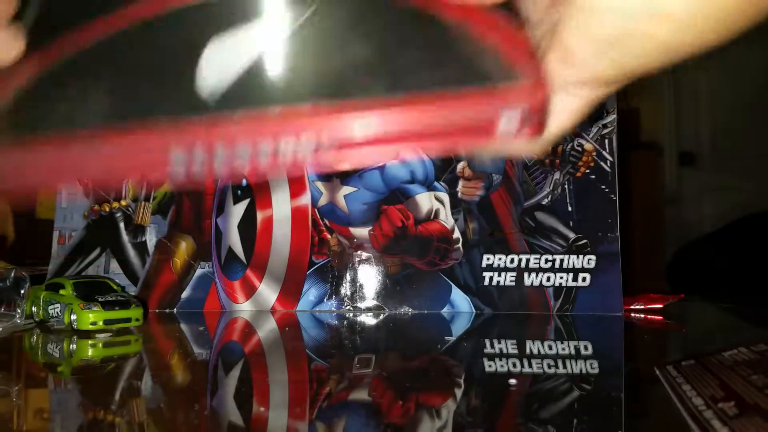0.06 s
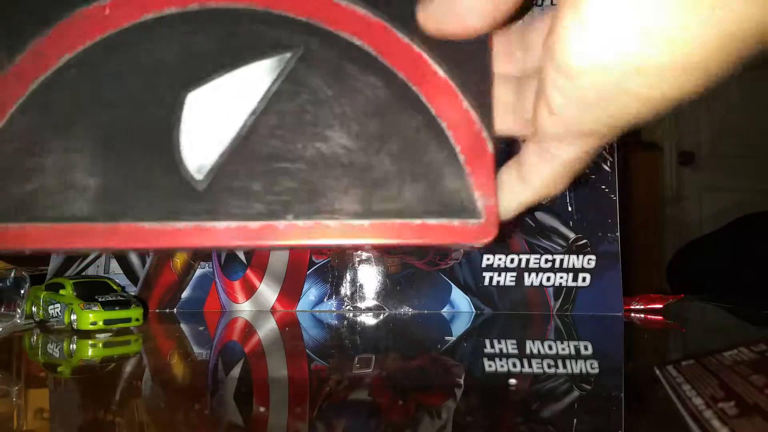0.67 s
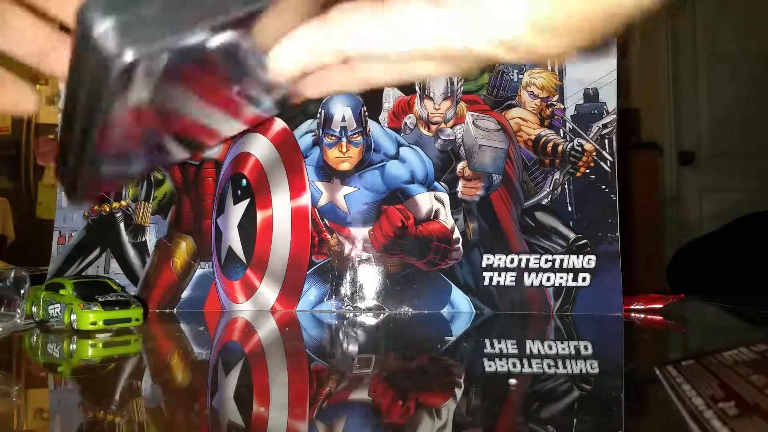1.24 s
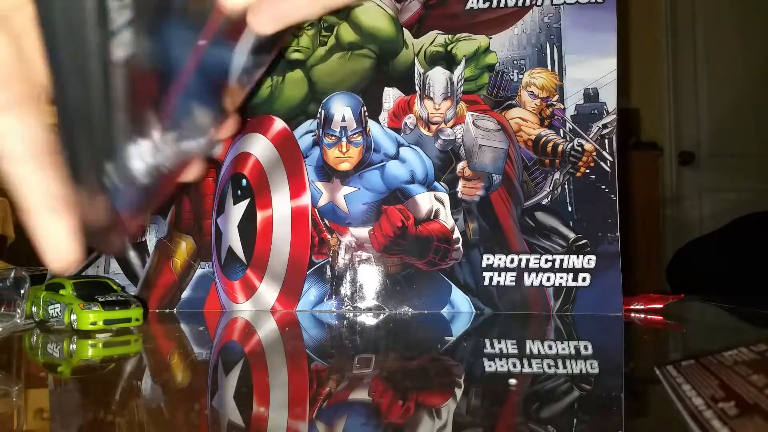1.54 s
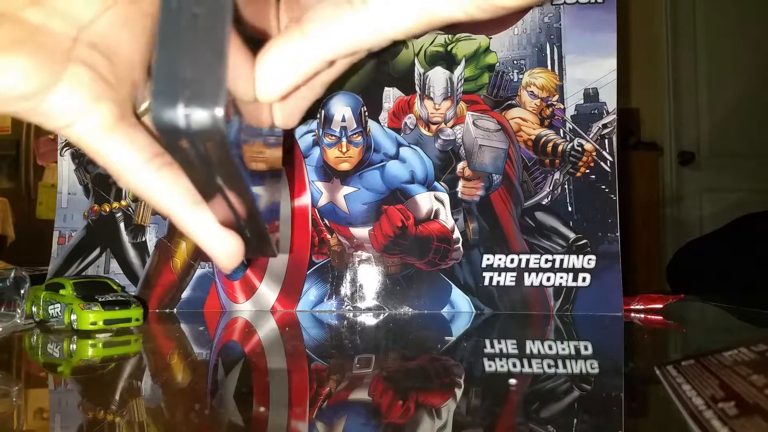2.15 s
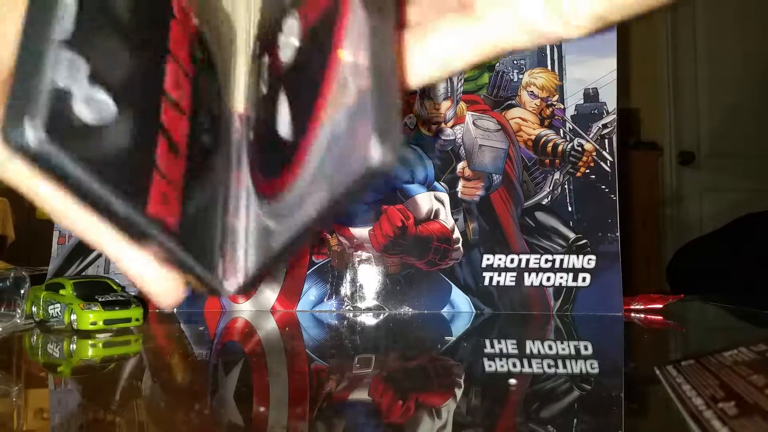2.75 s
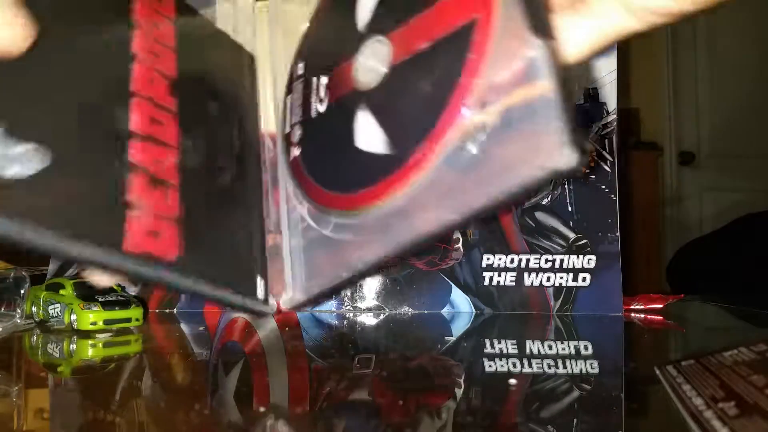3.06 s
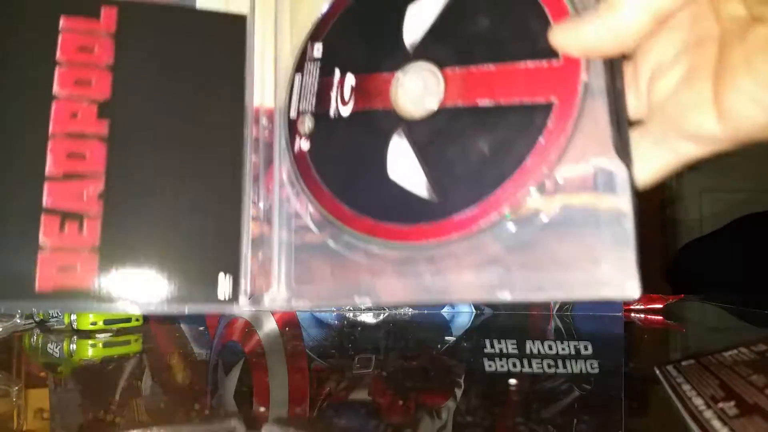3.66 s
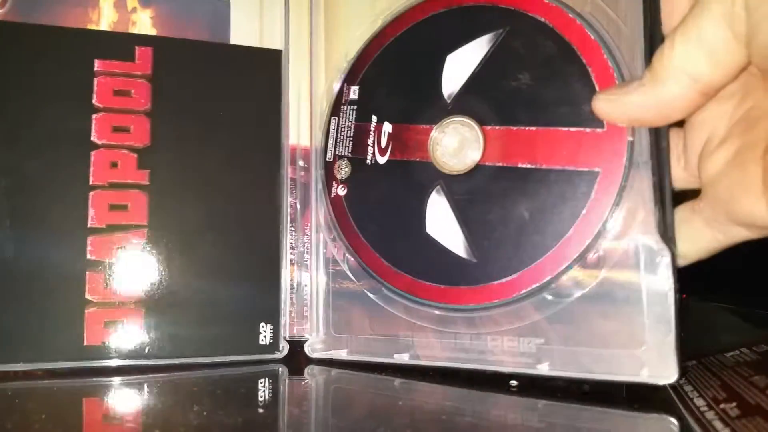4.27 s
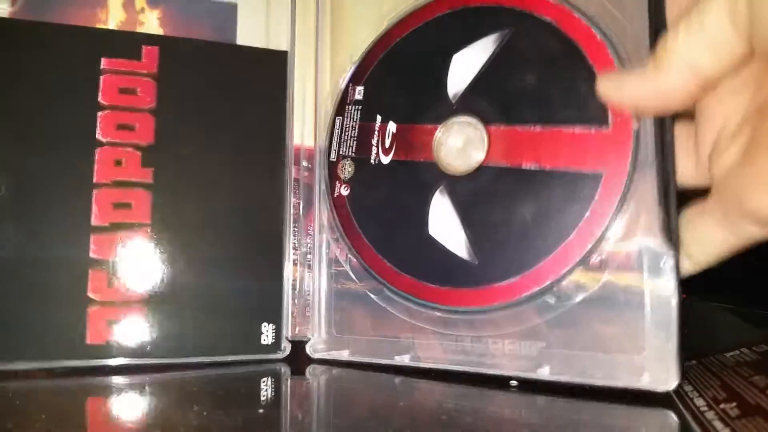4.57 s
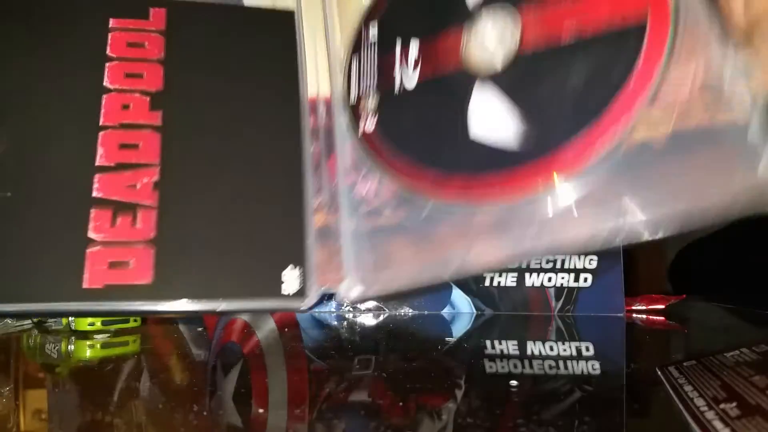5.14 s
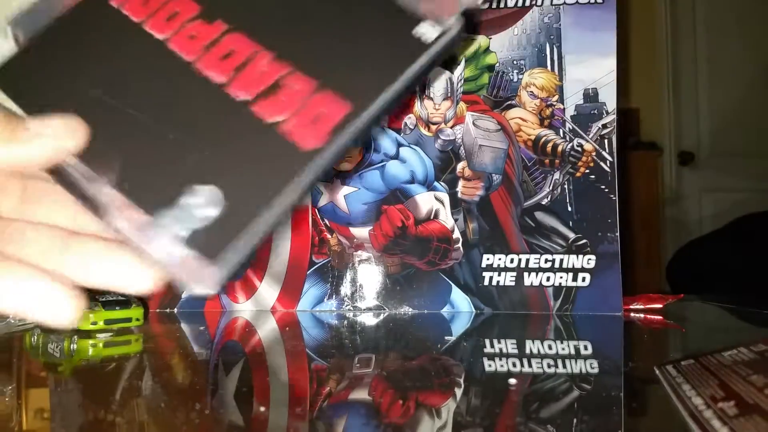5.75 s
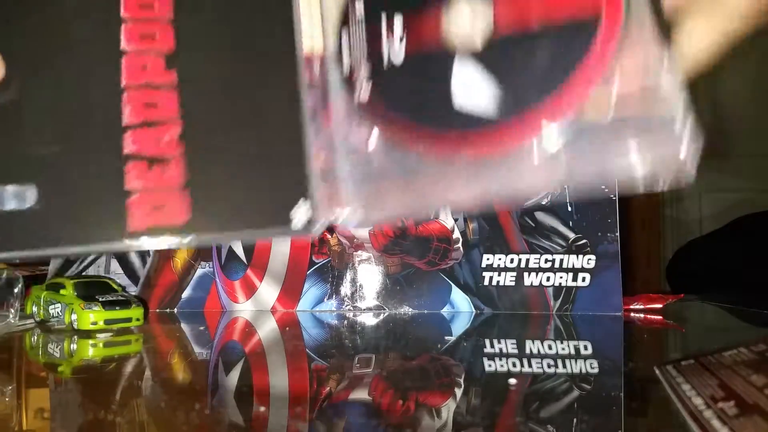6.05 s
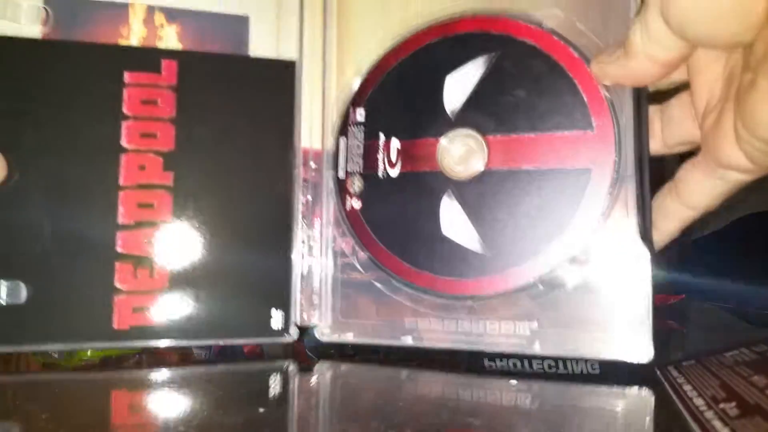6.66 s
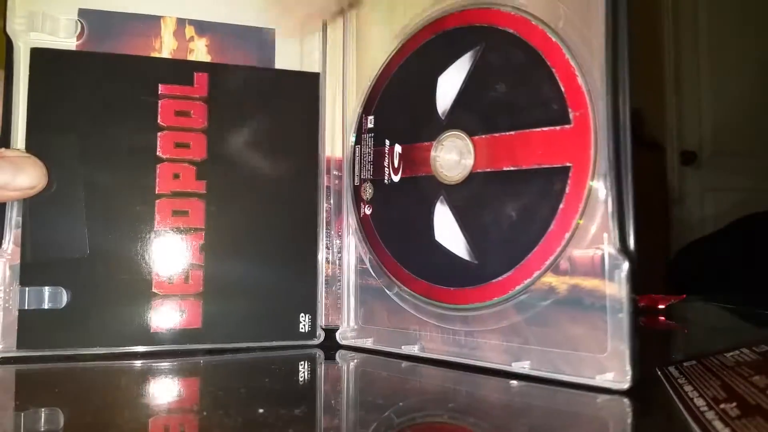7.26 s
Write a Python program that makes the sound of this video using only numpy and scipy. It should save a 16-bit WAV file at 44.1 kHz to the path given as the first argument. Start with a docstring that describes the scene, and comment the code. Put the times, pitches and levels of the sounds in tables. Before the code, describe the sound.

For the first two seconds, fingertips tap and slide on a closed metal disc case, making soft hollow clacks that cluster around one second. A faint skin squeak follows. At about 2.7 seconds the catch lets go with a loud, quick crack and a short tinny ring, trailed by light plastic ticks and rubbing. At 4 seconds the case lands on a glass-topped table with a loud, solid knock, then bumps softly several times around 4.5 seconds. A faint slide and squeak come near 5.5 seconds. From 6.4 seconds the plastic tray gives tiny dry ticks under quiet rubbing, with a moderate double knock at 6.8 seconds and lighter knocks at 7.3 and 7.4. Everything sounds close, in a small quiet room, over a faint appliance hum, microphone hiss and a very faint high pulsing note.

```python
"""Opening a metal disc case

In a small quiet room, fingers tap, slide and squeak on the case's tin shell. The catch lets go in a
quick run of cracks, the plastic tray ticks, and the open case knocks several times on a glass-topped
table. Each contact is a noise crack plus the ringing modes of the shell or table; each slide is grainy
stick-slip noise. Behind it all are a faint appliance hum, microphone hiss and a high, pulsing note."""
import sys
import numpy as np
from scipy import signal
from scipy.fft import rfft, irfft
from scipy.io import wavfile
from scipy.ndimage import uniform_filter1d

SR = 44100
rng = np.random.default_rng(int(sys.argv[2]) if len(sys.argv) > 2 else 0)


def wav_record(signal):
    """Record a signal, one row per channel, as 16-bit PCM in the file named by sys.argv[1]."""
    frames = np.transpose(np.atleast_2d(signal))
    bounded = np.clip(frames, -1, 1)
    # unit amplitude maps onto the largest positive 16-bit level
    quanta = np.round(bounded * 32767).astype(np.int16)
    wavfile.write(sys.argv[1], SR, quanta)


N = 331323

# edges of a contact's six bands, thump, body, panel, clack, click and fizz: (frequency [Hz])
BAND_EDGES = [45, 145, 450, 1400, 3500, 7500, 16000]
# modes of the tin shell before the hands damp it: (frequency [Hz], level [dB], t60 [s])
SHELL_MODES = [(72, -8, 0.011), (114, -7, 0.055), (173, -2, .05), (255, -1, .04), (360, -11.5, .05),
               (458, 1.5, 0.022), (631, 11, 0.054), (703, 5.5, 0.053), (825, 0, 0.082), (969, -14, 0.035),
               (1134, -8, 0.062), (1425, -11, 0.1), (1864, -2, 0.038), (2094, -7.5, 0.049),
               (2240, -4.5, 0.033), (3050, -13.5, 0.04), (3130, -13.5, 0.06), (4240, -10.5, 0.036),
               (5266, -4.5, .04), (6965, -16.5, .04)]
# strokes of a hand over the case: (start [s], end [s], murmur level [dB], hiss over murmur [dB])
HAND_STROKES = [(0.168, 0.369, -67, -1), (0.651, 1.359, -65, -8), (0.931, 1.073, -60, -28),
                (1.039, 1.186, -51, -12), (1.379, 2.25, -68.5, -5.5), (2.819, 3.074, -72, 5),
                (3.055, 3.176, -61, 3), (4.455, 4.634, -63, -1.5), (4.6, 5.118, -69, -2),
                (5.43, 5.565, -66.5, 10), (5.899, 6.351, -80.5, 12), (6.419, 7.098, -67.5, -1.5)]


def amp(db):
    """Decibels to gain."""
    return 10 ** (np.asarray(db) / 20)


def unit(x):
    """Scales to rms 1."""
    return x / np.sqrt(np.mean(x ** 2) + 1e-20)


def curve_at(points, hz):
    """Joins (frequency [Hz], value) points by straight lines on a log frequency axis."""
    point_hz, value = np.transpose(points)
    return np.interp(np.log(hz + 1), np.log(point_hz + 1), value)


def colour(x, spectrum):
    """Equalises a sound with a (frequency [Hz], gain [dB]) curve."""
    size = x.shape[-1]
    return irfft(rfft(x) * amp(curve_at(spectrum, np.fft.rfftfreq(size, 1 / SR))), size)


def add(mix, start_s, sound):
    """Mixes a stereo sound in at its start time."""
    part = mix[:, max(round(start_s * SR), 0):][:, :sound.shape[1]]
    part += sound[:, :part.shape[1]]


def noise_pair(size, shared):
    """White noise at two microphones that have a share of its power in common."""
    common, *own = rng.standard_normal((3, size))
    return np.sqrt(shared) * common + np.sqrt(1 - shared) * np.array(own)


def panned(x, left_db):
    """Leans a stereo sound to the left."""
    return x * amp([[left_db / 2], [-left_db / 2]])


def voicing(tone, strength_db, hardness, thud_db=0, thud_hz=150, left_db=0):
    """A contact's band levels and pan: a hard edge or nail tilts the treble up, weight adds a thud."""
    centres = np.sqrt(np.multiply(BAND_EDGES[:-1], BAND_EDGES[1:]))
    octaves = np.log2(centres / centres[2])  # above the panel band
    tilt = hardness * np.maximum(octaves, 0)
    thud = thud_db - 3 * np.log2(centres / thud_hz) ** 2  # 3 dB weaker one octave off its pitch
    return strength_db + np.array(tone) + tilt + thud * (octaves < 0), left_db


def strike(levels_db, modes, attack_s, ring_db, crack_t60, rattle_db, rattle_t60, shared, phase_spread):
    """One contact: a crack, a rattle of dense plate modes and the object's ring, balanced by band."""
    t = np.arange(SR // 4) / SR
    hz, db, t60 = np.transpose(modes)[:, :, None]
    # the grip changes between contacts and detunes the upper modes a little
    hz = hz * (1 + .02 * hz / (hz + 500) * rng.standard_normal(hz.shape))
    # each microphone hears a mode at its own phase
    phase = phase_spread * np.sqrt(hz / 1000) * rng.standard_normal((2, len(modes), 1))
    ring = (amp(db - 60 * t / t60) * np.sin(2 * np.pi * hz * t + phase)).sum(axis=1)
    noise_decay = amp(-60 * t / crack_t60) + amp(rattle_db - 60 * t / rattle_t60)
    crack = noise_pair(len(t), shared) * noise_decay
    blow = (amp(ring_db) * ring + crack) * (1 - np.exp(-t / attack_s))
    out = 0
    for level_db, bottom, top in zip(levels_db, BAND_EDGES, BAND_EDGES[1:]):
        order = 2 if bottom < 400 else 3
        band = signal.sosfilt(signal.butter(order, [bottom, top], "band", fs=SR, output="sos"), blow)
        out = out + amp(level_db) * band / band[:, :SR // 50].std()  # sets the rms of the first 20 ms
    return out


def contacts(hits, tone, modes, **touch):
    """Plays a list of contacts on one object."""
    out = np.zeros((2, N))
    for start_s, *blow in hits:
        levels_db, left_db = voicing(tone, *blow)
        add(out, start_s, panned(strike(levels_db, modes, **touch), left_db))
    return out


def room_tone(level_db=-64.5):
    """The low murmur of the room, closest to mono in the low mids."""
    # murmur spectrum: (frequency [Hz], relative density [dB])
    spectrum = [(20, 1), (50, -5), (100, -0.5), (160, -6), (240, -2.5), (340, -2.5), (430, -7),
                (800, -12.5), (1300, -18), (2600, -19.5), (3200, -23), (4400, -21.5), (7000, -43)]
    # likeness of left and right: (frequency [Hz], coherence [ratio, negatives count as 0])
    coherence = [(60, -0.28), (180, 0.89), (550, 0.7), (1650, -1.7), (4970, -0.0), (15000, -0.03)]
    left, other = rfft(rng.standard_normal((2, N)))
    alike = np.clip(curve_at(coherence, np.fft.rfftfreq(N, 1 / SR)), 0, 1)
    right = alike * left + np.sqrt(1 - alike ** 2) * other
    return amp(level_db) * unit(colour(irfft([left, right], N), spectrum))


def microphone_hiss(level_db=-72.5):
    """Each microphone adds its own steady, bright noise."""
    # hiss spectrum: (frequency [Hz], relative density [dB])
    spectrum = [(20, -34), (4300, -16.5), (4900, 2.5), (5700, -1), (6400, -6.5), (7400, -13.5), (11000, -9),
                (16000, -10.5)]
    return amp(level_db) * unit(colour(rng.standard_normal((2, N)), spectrum))


def appliance_hum(waver_rad=0.72):
    """An appliance hums on a few low partials, each wavering slowly in phase."""
    # hum partials: (frequency [Hz], rms level [dB])
    partials = [(120, -73), (232, -78), (292, -79.5), (360.5, -71), (721, -85)]
    t, knots = np.arange(N) / SR, np.linspace(0, N / SR, num=40)
    hum = 0
    for hz, db in partials:
        waver = np.interp(t, knots, rng.standard_normal(len(knots)))
        hum = hum + amp(db) * np.sqrt(2) * np.sin(2 * np.pi * hz * t + waver_rad * waver)
    return hum


def high_chirp(centre_hz=5850, half_width_hz=130, pulse_hz=4.98, peak_s=2.4, level_db=-79):
    """A faint, fuzzy high note that keeps swelling and fading, like a far cricket."""
    hz, t = np.fft.rfftfreq(N, 1 / SR), np.arange(N) / SR
    detune = (hz - centre_hz) / half_width_hz
    note = irfft(rfft(rng.standard_normal((2, N))) / (1 + detune ** 2), N)
    swell = np.cos(np.pi * pulse_hz * (t - peak_s)) ** 2
    return amp(level_db) * unit(note * swell)


def finger_taps():
    """Soft fingertips make the shut, hollow shell clack; the hands shorten its ring."""
    # taps: (time [s], strength [dB], hardness [dB/octave], thud [dB], thud pitch [Hz])
    taps = [(0.0873, -51, 1, 4.5, 260), (0.1046, -55.5, 0, -6, 187), (0.1597, -43, -1, -18, 171),
            (0.1884, -63.5, -1, 28, 71.4), (0.2051, -59.5, 3.5, 14, 285), (0.3124, -54.5, -1, -3, 119),
            (0.7747, -61.5, -1, -5, 109), (0.9361, -55.5, -2, 4.5, 170), (0.9798, -49, -16, 6, 150),
            (0.9981, -53, -0.5, -4, 90), (1.0493, -40.5, 1, 5, 111), (1.0568, -51.5, 3.5, 20.5, 70),
            (1.0647, -41.5, 0, -3, 130), (1.1095, -44.5, -6, 6.5, 110), (1.1242, -48.5, 2, 7, 200),
            (1.1992, -48, 1.5, -7, 80), (1.5109, -58, 2, 12, 65.5), (1.6552, -50, 0, 0, 260),
            (1.8653, -55, 0.5, -1, 90), (1.9861, -60, -2.5, 8, 90)]
    # tone of a tap, thump to fizz: (band gain [dB])
    tone = [-14, -6.5, 0.5, -12, -15, -28.5]
    held_shell = [(hz, db, t60 * 0.51) for hz, db, t60 in SHELL_MODES]
    return contacts(taps, tone, held_shell, attack_s=0.0011, ring_db=-5, crack_t60=0.021,
                    rattle_db=-14, rattle_t60=0.038, shared=0.14, phase_spread=0.16)


def hand_slides(grain_db=3.5):
    """Sliding skin sticks and slips: grainy hiss, and a murmur from the shell beneath."""
    # the shell's murmur: (frequency [Hz], relative density [dB])
    murmur_spectrum = [(50, -2), (120, -3.5), (400, -5), (640, -1), (880, -11.5), (1300, -12.5),
                       (3000, -34), (9000, -55)]
    # the skin's hiss: (frequency [Hz], relative density [dB])
    hiss_spectrum = [(300, -17), (520, 7.5), (800, -26), (1300, -3), (2300, 2), (3400, 1.5), (6200, 2.5),
                     (8500, -8), (15000, -11.5)]
    out = np.zeros((2, N))
    for start, end, murmur_db, hiss_db in HAND_STROKES:
        size = round((end - start) * SR)
        grip = amp(grain_db * unit(uniform_filter1d(rng.standard_normal(size), size=180)))
        murmur = amp(murmur_db) * unit(colour(grip * noise_pair(size, shared=0.98), murmur_spectrum))
        hiss = amp(murmur_db + hiss_db) * unit(colour(grip * noise_pair(size, shared=0.1), hiss_spectrum))
        add(out, start, (murmur + hiss) * signal.windows.tukey(size, .7))
    return out


def stroke_slips(per_stroke=2, offset_db=-1, scatter_db=3.5, hardness=-3.3):
    """Lists the faint ticks each hand stroke sheds at random; a firmer stroke sheds louder ones."""
    slips = []
    for start, end, stroke_db, _ in HAND_STROKES:
        for _ in range(per_stroke):
            time_s = start + (end - start) * rng.beta(2, 2)
            strength_db = stroke_db + offset_db + scatter_db * rng.standard_normal()
            slips.append((time_s, strength_db, hardness))
    return slips


def tray_ticks():
    """Plastic slips in small dry steps as the tray flexes."""
    # tray and hinge ticks: (time [s], strength [dB], hardness [dB/octave])
    ticks = [(0.6541, -66.5, -2.5), (2.7573, -50, 0.05), (2.844, -59.5, -3), (2.8818, -62, -0.5),
             (2.9383, -59, -2), (2.9899, -58, -0.5), (3.0063, -61, -0.5), (5.2001, -65, -3),
             (5.236, -68, -.3), (6.4048, -81, 6), (6.4832, -68.5, 0.4), (6.5195, -68, 1.2),
             (6.5502, -69.5, 5.5), (6.5612, -81, 6.5), (6.5944, -73.5, 4), (6.6425, -75, 4),
             (6.6576, -62, 1.1), (6.6659, -72, 4), (6.7227, -69, 2.2), (6.733, -80, 5.5),
             (6.7935, -68.5, 4), (7.2326, -67, 3), (7.4993, -71.5, 2.5)]
    # tone of a tick, thump to fizz: (band gain [dB])
    tone = [-27, -9.5, -2.5, -2.5, -2, -9]
    out = contacts(ticks + stroke_slips(), tone, SHELL_MODES, attack_s=0.00049, ring_db=-45,
                   crack_t60=0.011, rattle_db=-10, rattle_t60=0.019, shared=0.1, phase_spread=0.99)
    return panned(out, left_db=0.5)


def skin_squeaks():
    """Dragged skin sticks and slips unevenly, drawing faint, fuzzy notes from the shell."""
    # squeaks: (start [s], end [s], pitch [Hz], blur [share of pitch], level [dB])
    squeaks = [(2.244, 2.307, 1735, 0.033, -73.5), (2.78, 3.192, 1230, 0.14, -70),
               (5.433, 5.542, 2200, .08, -63.5), (5.482, 5.549, 546, .06, -61.5)]
    out = np.zeros((2, N))
    for start, end, pitch_hz, blur, db in squeaks:
        size = round((end - start) * SR)
        detune = (np.fft.rfftfreq(size, 1 / SR) / pitch_hz - 1) / blur
        note = irfft(rfft(noise_pair(size, shared=0.72)) / (1 + detune ** 2), size)
        add(out, start, amp(db) * unit(note) * signal.windows.tukey(size, .7))
    return out


def catch_snap(free_ring_db=-56):
    """The catch cracks free with a close thud like a puff of air, the halves spring apart, and the tin rings
    on."""
    # cracks of the catch:
    # (time [s], strength [dB], hardness [dB/octave], thud [dB], thud pitch [Hz], left over right [dB])
    cracks = [(2.67, -24, -2, 6.5, 260, -1.5), (2.674, -22, -3.5, 4.5, 110, 0.3),
              (2.6813, -23.5, 0.5, -0.5, 120, -4), (2.6843, -30.5, 4.5, 4, 210, 4.5),
              (2.688, -37.5, 2, 4.5, 95, 12)]
    # tone of a crack, thump to fizz: (band gain [dB])
    tone = [-5, -2.5, 0, -6.5, -11, -25]
    # modes of the freed halves: (frequency [Hz], relative level [dB], t60 [s])
    free_modes = [(1120, 5.5, 0.4), (1220, -0.5, 0.64), (1276, -12.5, 1), (1402, -8.5, 0.35),
                  (1830, 8.5, 0.3), (2160, -14, .3), (2300, -16.5, 0.28), (2980, -1.5, .25), (3160, 9, .25)]
    held_shell = [(hz, db, t60 * 0.58) for hz, db, t60 in SHELL_MODES]
    snap = contacts(cracks, tone, held_shell, attack_s=0.0006, ring_db=-11.5, crack_t60=0.012,
                    rattle_db=-29.5, rattle_t60=0.034, shared=0.33, phase_spread=0.19)
    t = np.arange(SR // 2) / SR
    release_s = cracks[2][0]  # the third crack
    for hz, db, t60 in free_modes:
        partial = np.sin(2 * np.pi * (hz * t + rng.random((2, 1))))
        add(snap, release_s, amp(free_ring_db + db - 60 * t / t60) * partial)
    return snap


def table_knocks(left_lead_s=0.00043, lowest_hz=75):
    """The edge of the case lands and the table top booms, reaching the left microphone first."""
    # landings of the case:
    # (time [s], strength [dB], hardness [dB/octave], thud [dB], thud pitch [Hz], left over right [dB])
    landings = [(4.0453, -23, -1.5, 3, 132, -1), (4.3762, -39.5, -8.5, 8.5, 270, 1),
                (4.4514, -45.5, 4, 21.5, 192, 0.3), (4.5729, -46.5, 0.5, 2.5, 179, -1.5),
                (4.6449, -47.5, -2.5, 8, 178, -2.5), (6.8156, -40.5, 2.5, 9.5, 128, 0),
                (6.8262, -44, 0.7, 20, 99, -2), (7.2612, -45, 2.2, 16, 246, -1.5),
                (7.431, -52, 1.3, 18.5, 209, 2)]
    # tone of a knock, thump to fizz: (band gain [dB])
    tone = [-5.5, 1, 1, -6.5, -11.5, -23.5]
    # modes of the table with the case on it: (frequency [Hz], level [dB], t60 [s])
    table_modes = [(105.5, 0, 0.19), (133, 0, 0.099), (186, 4.5, 0.042), (219.7, -0.5, 0.076),
                   (288.4, -9, 0.18), (329.5, 2.5, 0.026), (458, -2.5, 0.062), (480, -25, 0.16),
                   (566, -3.5, 0.084), (678, -1.5, 0.06), (831, -4.5, 0.056), (970, -2, 0.023),
                   (1069, -15, 0.086), (1214, -20, 0.045), (1445, -9, 0.043), (1540, -13, 0.035),
                   (1664, -16, 0.06), (1920, -15.5, 0.047), (2480, -12.5, 0.045), (2940, -15, 0.038),
                   (5460, -5.5, 0.035)]
    left, right = contacts(landings, tone, table_modes, attack_s=0.00066, ring_db=-3, crack_t60=0.018,
                           rattle_db=-6, rattle_t60=0.036, shared=0.15, phase_spread=1.0)
    knocks = np.array([left, np.roll(right, round(left_lead_s * SR))])
    # the table top is too small to radiate the deepest bass
    return signal.sosfilt(signal.butter(2, lowest_hz, "high", fs=SR, output="sos"), knocks)


def room_reverb(send, predelay_s=0.0065, reflections_per_s=3000):
    """A small room: sparse reflections of random sign, each band dying at its own speed."""
    # reverb time: (frequency [Hz], t60 [s])
    decay_times = [(100, 0.35), (300, 0.27), (1000, 0.29), (3000, 0.3), (7000, 0.27), (15000, 0.23)]
    # colour of the tail: (frequency [Hz], gain [dB])
    tail_eq = [(50, -26), (110, -16.5), (250, -11), (700, -13), (1500, -10), (3000, -7.5), (7000, -12),
               (15000, -7.5)]
    size = SR * 2 // 3
    reflections = rng.choice([-1., 1.], (2, size)) * (rng.random((2, size)) < reflections_per_s / SR)
    reflections[:, :round(predelay_s * SR)] = 0
    hz, t, bands = signal.stft(reflections, SR, nperseg=256)
    # long waves reach both microphones alike
    alike = 1 / (1 + (hz[:, None] / 650) ** 2)
    bands[1] = alike * bands[0] + np.sqrt(1 - alike ** 2) * bands[1]
    decay = amp(-60 * t / curve_at(decay_times, hz)[:, None])
    _, tail = signal.istft(bands * decay, SR, nperseg=256)
    tail = colour(tail / np.linalg.norm(tail[0]), tail_eq)[:, :SR // 2]
    return signal.fftconvolve(send, tail, axes=1)[:, :N]


def scene():
    """The case close up over a quiet bed; each handling sound has its own reverb send."""
    snap, knocks, taps, ticks = catch_snap(), table_knocks(), finger_taps(), tray_ticks()
    friction = hand_slides() + skin_squeaks()
    direct = snap + knocks + taps + ticks + friction
    send = amp(-3) * snap + amp(-1.5) * knocks + amp(-1) * taps + amp(1) * ticks + friction
    return direct + room_reverb(send) + room_tone() + microphone_hiss() + appliance_hum() + high_chirp()


def record(dry, bass_hz=40, top_hz=15900):
    """Small microphones lose the deepest bass, and a steep low-pass trims the very top."""
    thinned = signal.sosfilt(signal.butter(2, bass_hz, "high", fs=SR, output="sos"), dry)
    low_pass = signal.firwin(511, top_hz, window=("kaiser", 9), fs=SR)
    return signal.oaconvolve(thinned, low_pass[None], "same", axes=1)


dry = scene()
out = record(dry)
wav_record(out)
```